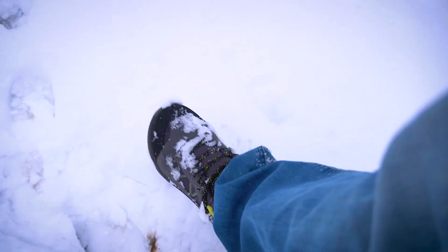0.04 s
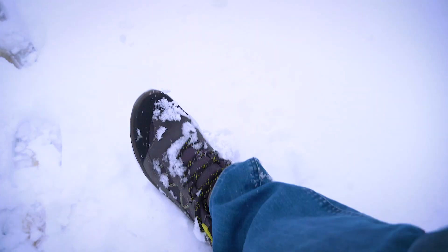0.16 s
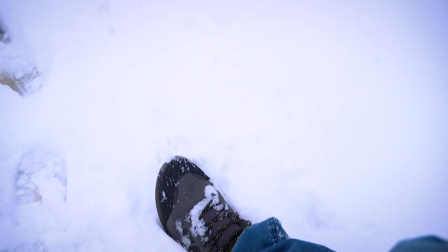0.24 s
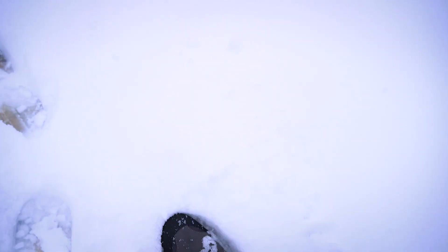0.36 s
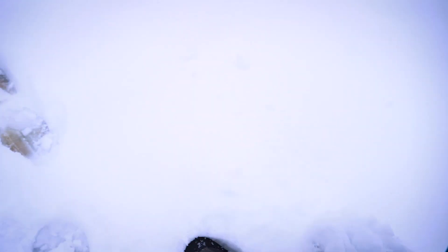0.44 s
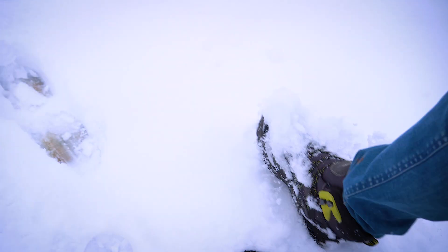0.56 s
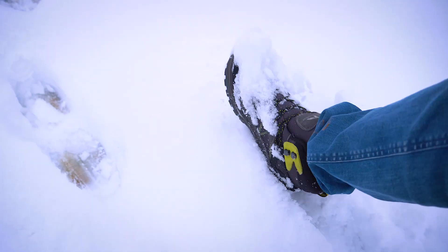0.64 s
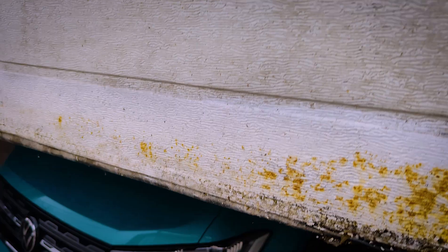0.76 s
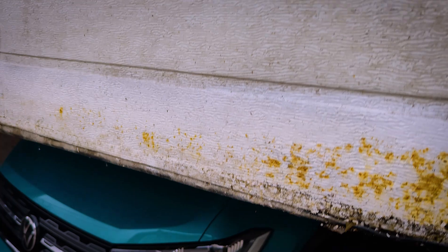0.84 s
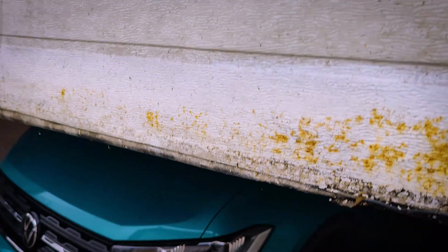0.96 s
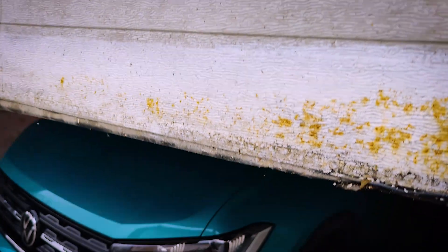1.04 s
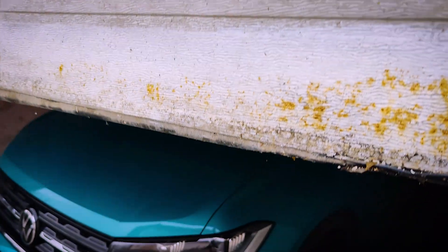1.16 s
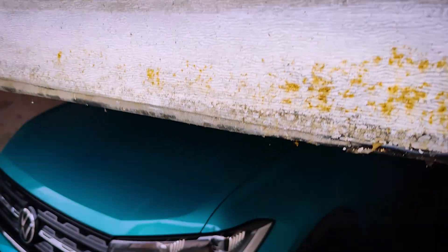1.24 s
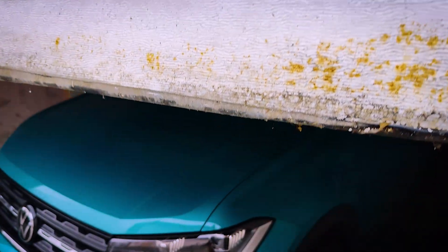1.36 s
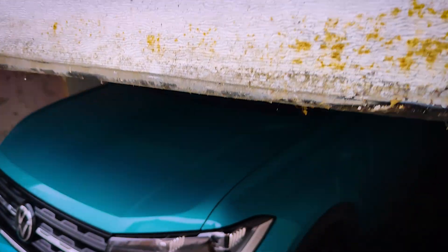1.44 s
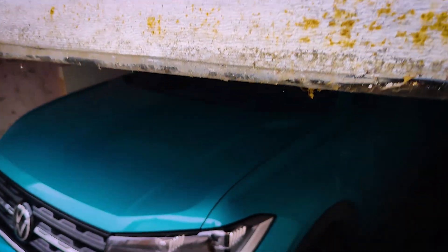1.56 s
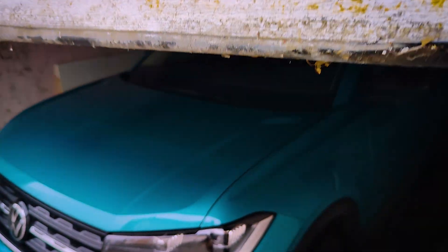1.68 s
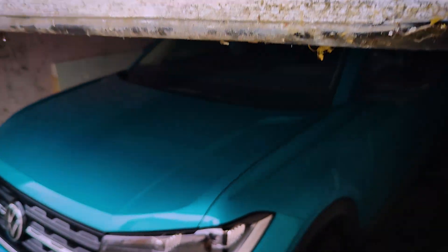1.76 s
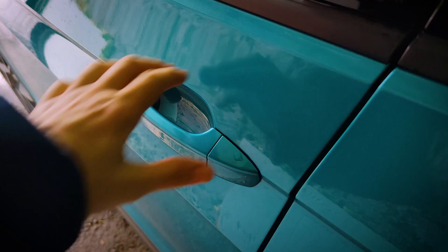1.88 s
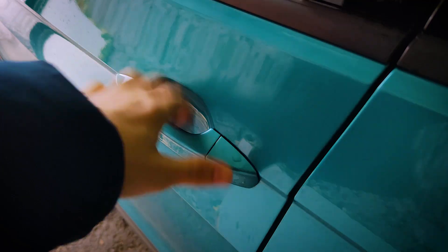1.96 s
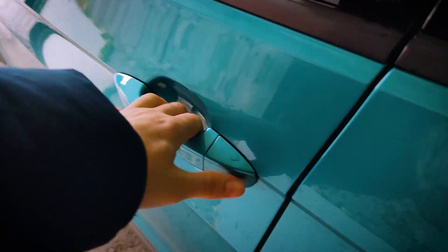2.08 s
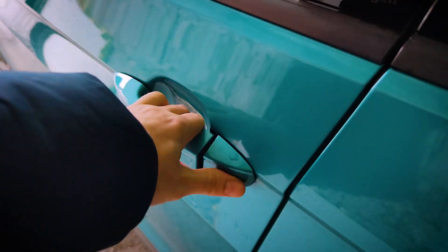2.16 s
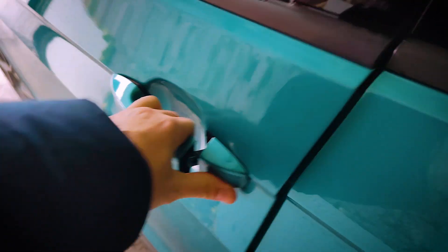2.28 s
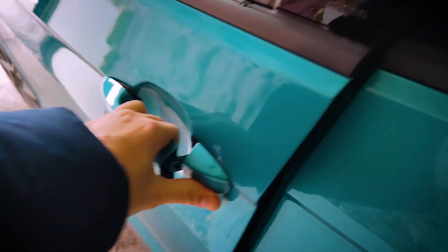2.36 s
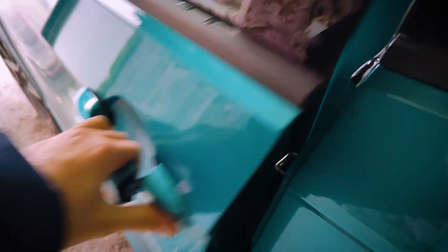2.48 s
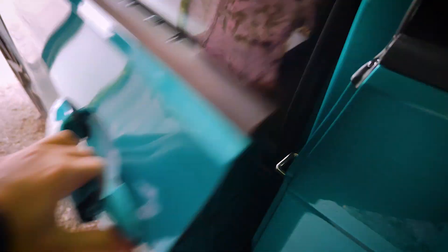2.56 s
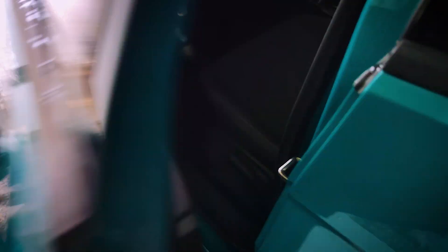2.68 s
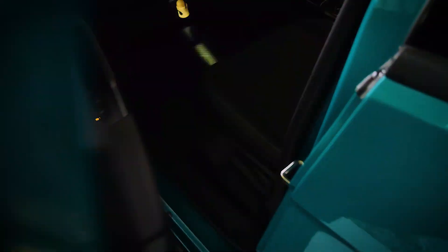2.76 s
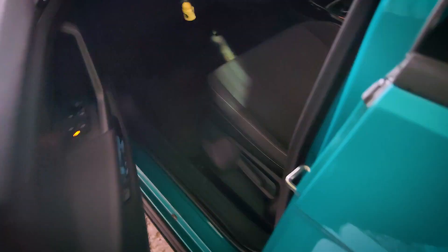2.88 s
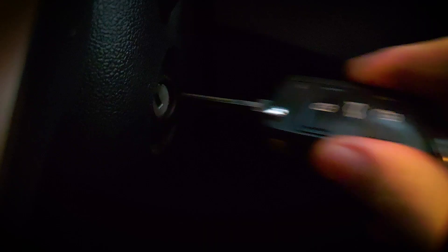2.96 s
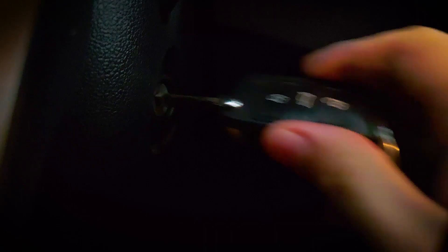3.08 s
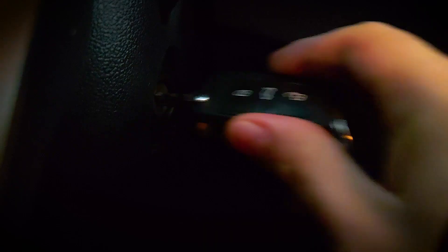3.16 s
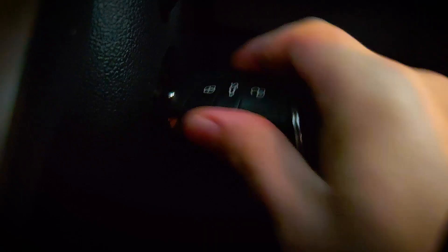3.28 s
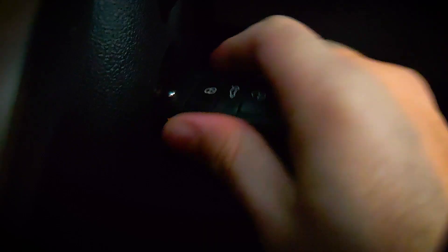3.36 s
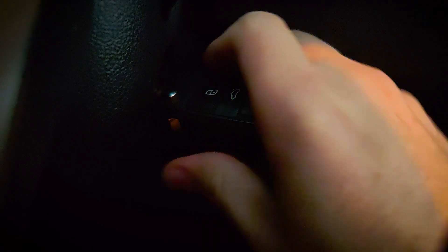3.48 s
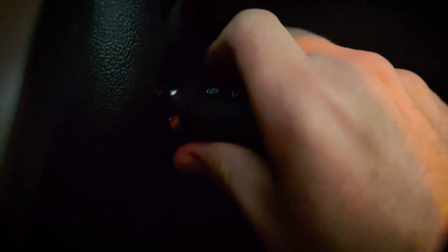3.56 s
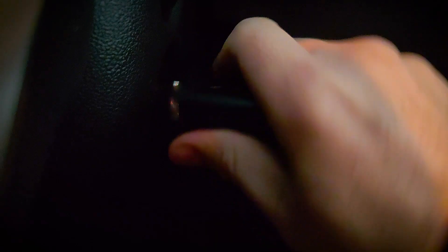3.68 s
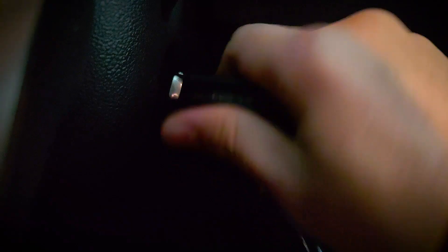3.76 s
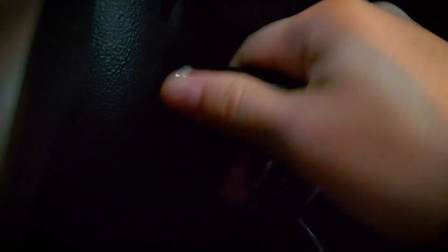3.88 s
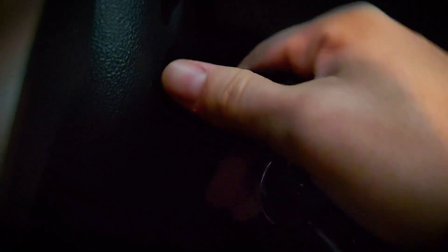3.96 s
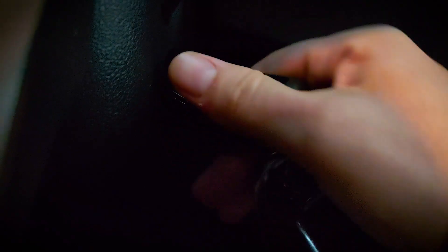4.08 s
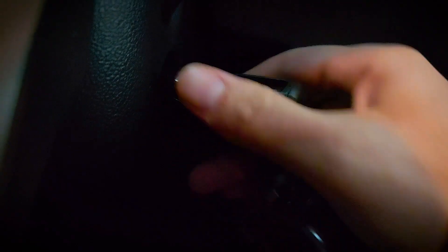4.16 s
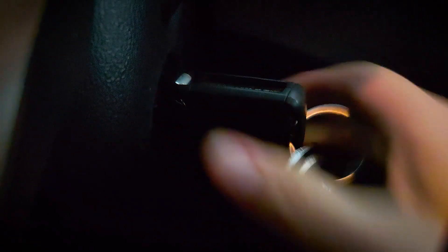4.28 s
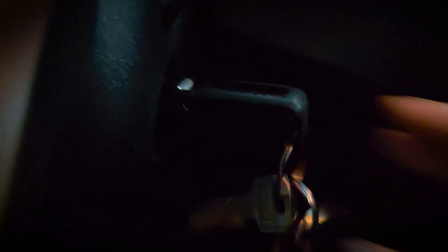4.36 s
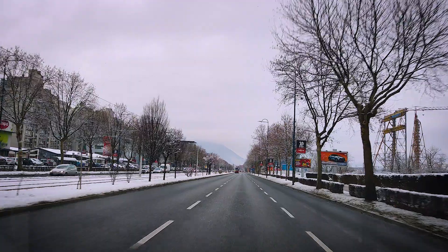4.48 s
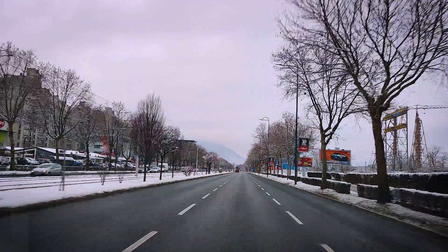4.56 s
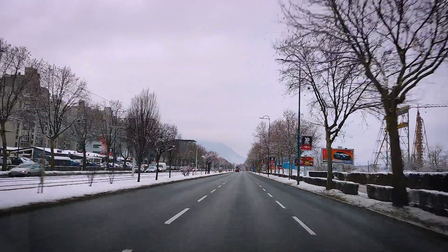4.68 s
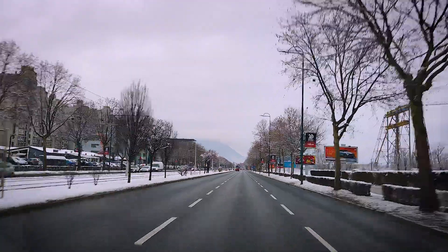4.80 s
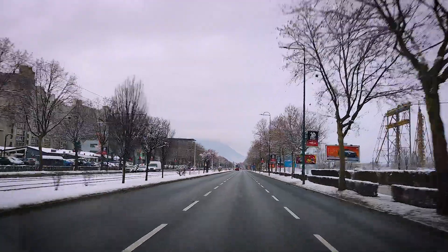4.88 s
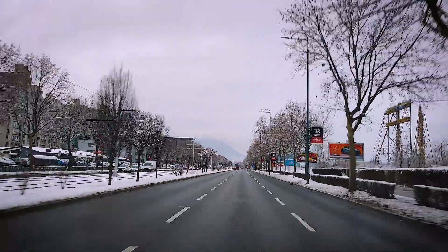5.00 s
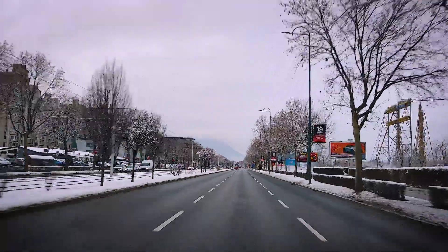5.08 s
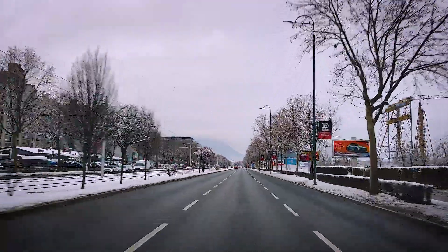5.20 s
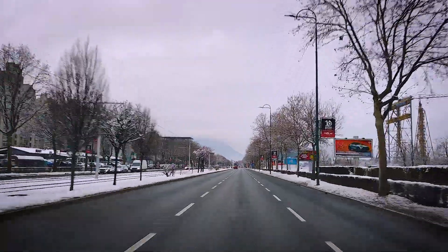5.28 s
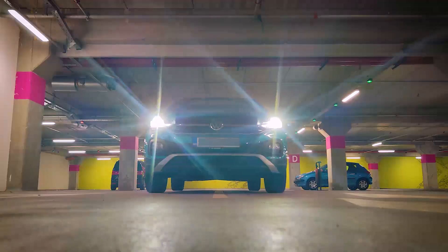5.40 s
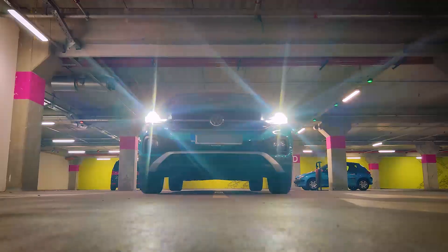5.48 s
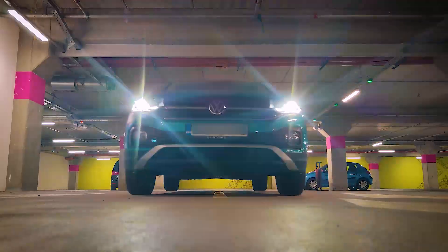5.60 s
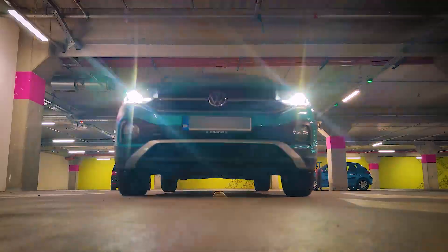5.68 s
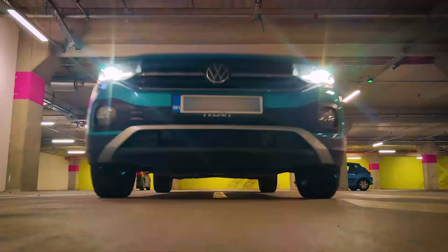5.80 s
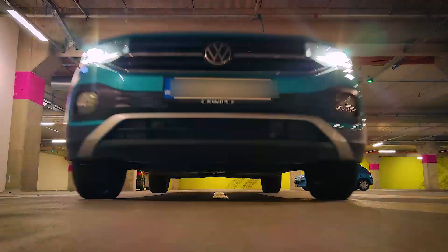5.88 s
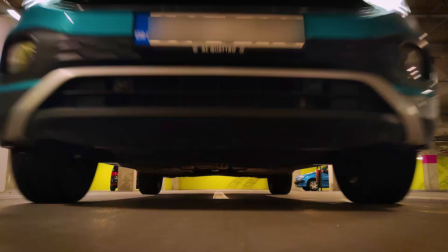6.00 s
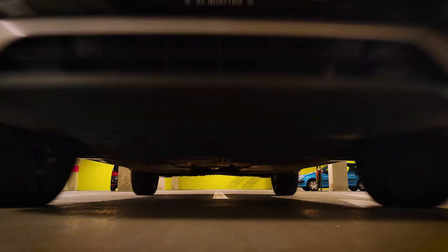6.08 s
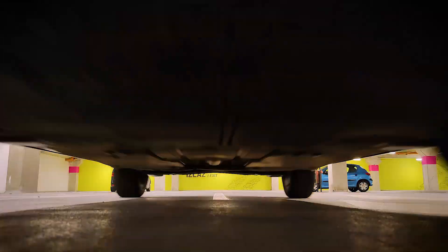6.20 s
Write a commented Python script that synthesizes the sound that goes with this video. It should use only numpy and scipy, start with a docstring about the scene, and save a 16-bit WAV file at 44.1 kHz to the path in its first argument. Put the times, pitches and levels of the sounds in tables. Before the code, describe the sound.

Boots crunch in snow, a motorized garage door hums open, a car door clacks, keys jingle and click, road rumbles, then a car rolls up close.

```python
"""Winter departure by car

Boots crunch through snow in grains and damped pops; a powered garage door hums and rolls up in coloured noise.
A car door is unlatched with clacks, ringing modes and a boom; a key clicks in the ignition, its ring jingling.
Filtered noise makes the road rumble in the cabin, with one bump. Then the car rolls up close in a concrete
car park: tyre hiss, engine tones and a pulsing whine grow with nearness."""
import sys
import numpy as np
from scipy import signal
from scipy.fft import rfft, irfft, next_fast_len
from scipy.io import wavfile
from scipy.ndimage import uniform_filter1d, map_coordinates

SR = 44100
rng = np.random.default_rng(int(sys.argv[2]) if len(sys.argv) > 2 else 0)


def transcribe(signal):
    """Save signal, clipped to [-1, 1], as a 16-bit WAV file at the path in sys.argv[1]."""
    frames = np.atleast_2d(signal).T
    limited = np.clip(frames, -1, 1)
    pcm = np.round(limited * 32767).astype(np.int16)
    wavfile.write(sys.argv[1], SR, pcm)


N = 275184

# stereo likeness out in the snow, close to the listener, and of the car: freq_hz, likeness (1 = identical sides)
SNOW_ALIKE = [(60, 1.0), (240, 1.0), (950, 1.0), (3770, 1.0), (15000, 1.0)]
NEAR_ALIKE = [(100, 0.92), (500, 0.71), (2000, 0.031), (10000, 0.12)]
CAR_ALIKE = [(60, 0.99), (150, 0.98), (380, 0.83), (950, 0.24), (2380, 0.2), (5980, 0.02), (15000, 0.02)]
# stereo balance of a centred source, of the car and of the key: freq_hz, left_minus_right_db
CENTRE = [(1000, 0)]
CAR_PAN = [(60, 0.5), (110, 0.0), (200, 1), (380, -5), (700, -1.5), (1290, -2), (2380, -4), (4400, -6),
           (8120, -13.5), (15000, 45)]
KEY_PAN = [(1000, 6.5), (4400, 0.5), (7400, -6.5), (8300, 9), (10000, 15), (14000, 12)]
# deep rumble of the breeze and of the door boom: freq_hz, level_db
RUMBLE_SPECTRUM = [(15, 3.5), (35, -13), (70, -1), (180, -4), (400, -27.5), (1500, -90)]
# dull murmur of the seat and of the floor pan: freq_hz, level_db
BODY_SPECTRUM = [(71, -56), (120, -6.5), (156, -8), (183, -5), (220, -1.5), (330, -9), (827, -34),
                 (900, -19), (1170, -32), (1980, -120)]


def amp(db):
    """Decibels to gain."""
    return 10 ** (np.asarray(db) / 20)


def unit(x):
    """Scale to rms 1."""
    return x / np.sqrt(np.mean(x ** 2) + 1e-20)


def along(points, hz):
    """Interpolate (Hz, value) points on a log frequency axis."""
    f, v = np.transpose(points)
    return np.interp(np.log(hz + 1), np.log(f + 1), v)


def wobble(rate):
    """A smooth random curve, rate knots a second."""
    knots = rng.standard_normal(int(N * rate / SR) + 4)
    return map_coordinates(knots, [np.arange(N) * rate / SR])


def ramp(start, length):
    """A straight rise from 0 to 1 over length seconds."""
    return np.clip((np.arange(N) / SR - start) / length, 0, 1)


def swell(start, end, attack, release):
    """Full level from start to end; attack and release are the seconds for 20 dB."""
    t = np.arange(N) / SR
    before = np.maximum(start - t, 0)
    after = np.maximum(t - end, 0)
    return amp(-20 * (before / attack + after / release))


def filtered(x, response):
    """Apply a response of frequency to x, in the spectrum."""
    n = x.shape[-1]
    m = next_fast_len(n + 8192)  # padding keeps the end from wrapping onto the start
    return irfft(rfft(x, m) * response(np.fft.rfftfreq(m, 1 / SR)), m)[..., :n]


def sides(pan_db):
    """Left and right gains for a level difference, averaging 1."""
    g = amp(np.array([[.5], [-.5]]) * pan_db)
    return g / g.mean(0)


def add(track, s, sound):
    """Mix a sound into the track from time s."""
    part = track[:, max(round(s * SR), 0):][:, :sound.shape[-1]]
    part += sound[..., :part.shape[1]]


def rush(spectrum, alike, pan=CENTRE, size=N, drive=1):
    """Coloured stereo noise, scaled so its middle has rms 1 before panning; drive makes it grainy."""
    def mid_and_side(hz):
        spread = np.tan(np.arccos(np.clip(along(alike, hz), -.6, 1)) / 2)
        return amp(along(spectrum, hz)) * np.array([np.ones_like(hz), spread])

    mid, side = filtered(drive * rng.standard_normal((2, size)), mid_and_side)
    stereo = np.array([mid + side, mid - side]) / mid.std()
    return filtered(stereo, lambda hz: sides(along(pan, hz)))


def grains(rate, scatter_db):
    """Sparse tiny impulses of uneven size, rate a second."""
    return (rng.random(N) < rate / SR) * amp(scatter_db * rng.standard_normal(N))


def ring(modes, t, scatter_db):
    """Sum of decaying sine modes, struck at slightly new strengths."""
    return sum(amp(db + scatter_db * rng.normal() - 60 * t / t60) * np.sin(2 * np.pi * hz * t)
               for hz, db, t60 in modes)


def pop(t, hz, cycles):
    """A push that swells and dies within a few cycles."""
    age = 4 * t * hz / cycles
    return age * np.exp(1 - age) * np.sin(2 * np.pi * hz * t)


def hum(lines, waver, flutter_db):
    """Unsteady machine tones; high ones reach the two ears out of step."""
    out = np.zeros((2, N))
    for hz, db in lines:
        phase = 2 * np.pi * np.cumsum(hz * (1 + waver * wobble(60))) / SR
        lag = np.array([[.5], [-.5]]) * min(hz / 900, 1)
        out += amp(db) * unit(amp(flutter_db * wobble(15)) * np.sin(phase + lag))
    return out


def patchy(x, depth_db):
    """Short-lived resonances: random gain patches over frequency and time."""
    z = signal.stft(x, nperseg=512)[2]
    across_hz = uniform_filter1d(rng.standard_normal(z.shape[1:]), size=3, axis=0)
    field = uniform_filter1d(across_hz, size=12, axis=1)
    gain = unit(amp(depth_db * unit(field)))
    return signal.istft(z * gain, nperseg=512)[1][:, :x.shape[1]]


def steady(x, size):
    """Even out the chance swells of a noise, over size samples."""
    power = np.abs(uniform_filter1d(x.mean(0) ** 2, size=size))
    return x / np.sqrt(power + .1)  # the floor limits the boost of lulls


def background():
    """Faint still air as shaped noise: centred out in the snow, wider and with less deep rumble indoors."""
    # still air: freq_hz, level_db
    air = [(15, -33), (25, 11.5), (274, -3), (411, 3.5), (552, -13), (666, -4.5), (1450, -7.5), (2700, -12),
           (6930, -10), (8140, -18.5), (13900, -13), (15500, -46)]
    outdoor_db, indoor_db = -58, -58.5
    indoors = ramp(.59, length=.049)
    room = filtered(rush(air, NEAR_ALIKE), lambda hz: amp(along([(30, -6), (120, 0.5)], hz)))
    return amp(outdoor_db) * (1 - indoors) * rush(air, SNOW_ALIKE) + amp(indoor_db) * indoors * room


def boots():
    """Each step swishes through powder, then packs the snow in dull grains, crisp crackle and pops of slipping."""
    # boot weight bearing on the snow: start_s, end_s, packing_db, crackle_db, powder_db (before a swish boost)
    steps = [(0.092, 0.133, -63, -66, -60.5), (0.365, 0.438, -38, -53, -53),
             (0.472, 0.496, -35.5, -49, -57), (0.802, 0.959, -34.5, -54, -50.5)]
    # snow giving way under the sole: start_s, level_db, pitch_hz, ringing_cycles, crack_db (relative)
    slips = list([(.2406, -18.5, 283, 2, -12), (.244, -20.5, 536, 3.6, -18), (.308, -20, 430, 1.2, -17),
                  (.3165, -32, 300, 1, -5), (.362, -26, 270, 2.8, -11), (.3715, -25.5, 325, 1.3, -9),
                  (.3825, -23, 396, 1.1, -6), (.4005, -27, 560, 2.7, -7), (.424, -39, 480, 1.6, -7),
                  (.432, -32, 420, 0.97, -4), (.4425, -35, 620, 1.4, -3), (.4625, -27, 398, 1.4, -6),
                  (.4705, -35, 640, 1.8, -5), (.4905, -26, 390, 1.6, -10), (.4968, -15.5, 382, 1.34, -8),
                  (.5015, -21.5, 690, 0.67, -10), (.585, -25, 696, 0.18, -28), (.795, -32.5, 614, 1.4, -7),
                  (.802, -30, 395, 3.1, -14), (.8275, -19.5, 396, 2.1, -2), (.849, -17.5, 455, 1.5, -0.5),
                  (.8805, -21.5, 420, 0.97, 1), (.911, -17.5, 594, 1.3, -3), (.9218, -22, 350, 1, 0.5),
                  (.937, -31, 442, 1.6, -5), (.955, -28, 418, 1.7, -10), (.9745, -27, 480, 1.4, -16),
                  (1.039, -18.5, 484, 1.1, -3)])
    # packed snow, snapping crystals and brushed powder: freq_hz, level_db
    packing_spectrum = [(76, -13), (150, -0.5), (260, 0.5), (380, -1), (480, -10), (620, -12), (800, -14),
                        (1450, -44), (2500, -35), (5500, -90)]
    crackle_spectrum = [(300, -23), (600, 2), (1000, -5), (1700, -3), (3000, -16), (5000, -22), (9000, -47)]
    powder_spectrum = [(530, -2), (900, -3), (1450, -4), (2480, -8), (3720, -7.5), (6280, -20),
                       (10600, -24.5), (12700, -30), (15500, -27)]
    pack_attack_s, swish_attack_s, release_s = .044, .28, .049  # powder is brushed aside before the snow packs
    small_slips, small_slip_db, small_slip_hz = 3, -6, 580  # lesser slips in each step, relative to its packing

    packing, crackle, powder = np.zeros((3, N))
    for start, end, packing_db, crackle_db, powder_db in steps:
        weight = swell(start, end, pack_attack_s, release_s)
        packing += amp(packing_db) * weight
        crackle += amp(crackle_db) * weight
        powder += amp(powder_db) * swell(start, end, swish_attack_s, release_s)
        for k, (late, pitch) in enumerate(rng.standard_normal((small_slips, 2))):
            s = start + (end - start) * (k + .5 + 0.19 * late) / small_slips
            slips.append((s, packing_db + small_slip_db, small_slip_hz * np.exp(.18 * pitch), 1.8, -8))

    out = packing * rush(packing_spectrum, SNOW_ALIKE, drive=grains(rate=1100, scatter_db=3))
    out += crackle * rush(crackle_spectrum, SNOW_ALIKE, drive=grains(rate=450, scatter_db=1.5))
    out += amp(5.5) * powder * rush(powder_spectrum, SNOW_ALIKE, drive=grains(rate=3500, scatter_db=-1.0))
    t = np.arange(SR // 25) / SR
    for s, db, hz, cycles, crack_db in slips:
        crack = amp(crack_db) * pop(t, hz=970, cycles=1.66)
        crumble = amp(-23.0 - 60 * t / 0.053) * rush(powder_spectrum, SNOW_ALIKE, size=len(t))
        add(out, s, amp(db) * (pop(t, hz, cycles) + crack + crumble))
    breeze = amp(-44.5) * swell(.37, 1, attack=2.4, release=0.28) * rush(RUMBLE_SPECTRUM, SNOW_ALIKE)
    return out + breeze


def thuds():
    """Soft heavy contacts swell and die at one low pitch."""
    # dull blows of heel, door panel and suspension: start_s, envelope_peak_db, pitch_hz, rise_s, t60_s
    blows = [(0.136, -40, 187, 0.0032, 0.18), (0.507, -27.5, 59, 0.0052, 0.25), (.675, -35, 53, .008, 0.13),
             (1.04, -26, 215, 0.0039, 0.26), (1.209, -27.5, 212, 0.0033, 0.18),
             (2.287, -28, 218, 0.0039, 0.11), (2.954, -35, 230, 0.0069, 0.2),
             (3.208, -37.5, 244, 0.0053, 0.066), (4.563, -17, 98, 0.0035, 0.16),
             (4.67, -17.5, 148.5, 0.015, 0.19), (4.714, -10, 118, 0.017, 0.11),
             (4.777, -16, 144, 0.0029, 0.098), (5.16, -22, 150, .008, .1), (5.496, -16, 128, 0.005, 0.088)]
    out, t = np.zeros((2, N)), np.arange(SR // 2) / SR
    for s, db, hz, rise, t60 in blows:
        envelope = (1 - np.exp(-(t / rise) ** 2)) * amp(-60 * t / t60)
        add(out, s, amp(db) * envelope / envelope.max() * np.sin(2 * np.pi * hz * t))
    return out


def garage_door():
    """The motor hums through the panels and the rollers run along their tracks, off to one side."""
    # droning panels and running rollers: freq_hz, level_db
    panel_spectrum = [(21, -45), (35, -46), (54, -4), (80, -25), (103, -4), (134, -10.5), (166, -6),
                      (211, 2.5), (320, -8.5), (356, -10), (382, -12.5), (579, -25), (600, -10.5),
                      (780, -22), (1320, -120)]
    roller_spectrum = [(260, -52), (450, -1.5), (650, -2), (900, -0.5), (1500, -2), (1870, 0), (2700, -9),
                       (3850, -5.5), (4600, -16), (5500, -14), (8100, -28), (13800, -31), (15500, -69)]
    # motor tones: pitch_hz, level_db (before the motor's overall level)
    motor_lines = [(59.2, -53), (177.6, -42), (355, -67), (624.5, -49), (712, -74)]
    # stereo width: freq_hz, likeness
    alike = [(100, 0.99), (500, 0.97), (2000, 0.32), (8000, 0.033)]
    # roller balance: freq_hz, left_minus_right_db
    pan = [(60, -0.5), (110, 0.0), (200, -1.0), (380, 4), (700, -3.5), (1290, -3), (2380, -7), (4400, -8.5),
           (8120, 6), (15000, 6)]
    start_s, run_up_s, left_behind_s, fade_s = .57, .47, 1.98, .8
    drone_db, drone_sag_db_per_s = -34, 9.5  # the panels quieten as they roll overhead
    roller_db, roller_sag_db_per_s = -37.5, 4
    motor_db, motor_growth_db_per_s = -11.5, 13.5  # the motor comes forward as the door lifts

    speed = ramp(start_s, run_up_s)
    full_speed_s = start_s + run_up_s
    lifting = np.clip(np.arange(N) / SR, full_speed_s, left_behind_s) - full_speed_s  # seconds at full speed
    heard = swell(0, left_behind_s, fade_s, fade_s)
    drone_level = amp(drone_db - drone_sag_db_per_s * lifting + 1.1 * wobble(9.6))
    drone = speed ** 2 * drone_level * rush(panel_spectrum, alike)
    roller_level = amp(roller_db - roller_sag_db_per_s * lifting + 0.35 * wobble(60))
    rolling = roller_level * rush(roller_spectrum, alike, pan, drive=grains(rate=6000, scatter_db=-0.5))
    motor_level = amp(motor_db + motor_growth_db_per_s * lifting)
    motor = motor_level * hum(motor_lines, waver=.006, flutter_db=2)
    lead_s = np.array([[.5], [-.5]]) * 0.00043  # the left ear hears it first
    return filtered(heard * speed * (drone + rolling + motor), lambda hz: np.exp(2j * np.pi * hz * lead_s))


def car_door():
    """The handle knocks as it is gripped and pulled; the latch springs and the hollow door booms."""
    # handle knocks: start_s, level_db, t60_s
    handle = [(2.03, -13.5, 0.046), (2.236, -25, 0.1), (2.29, -30, 0.085), (2.496, -29.5, 0.13)]
    # the latch lets go and the door shudders: start_s, clack_db, panel_ring_db, steel_ring_db
    latch = [(2.3546, -2.5, -3.5, -23), (2.3604, -7.5, -28, -26), (2.3691, -8.5, -11, -26.5),
             (2.389, -15, -14, -42), (2.412, -26, -15.5, -52), (2.437, -36, -23, -60)]
    # gripped handle and latch clack: freq_hz, level_db
    grip_spectrum = [(110, -18), (180, -4), (322, 1), (518, 0.5), (668, 1), (847, -26), (980, -12.5),
                     (1460, -15.5), (1750, -33), (3570, -17.5), (4520, -25), (14000, -43), (15000, -70)]
    clack_spectrum = [(180, -17), (240, 4.5), (295, -2), (350, -14), (423, -12), (568, -5), (1020, -20),
                      (1470, -25), (1910, -26), (2300, -21), (2700, -26), (3020, -18), (3400, -23.5),
                      (4320, -30), (5800, -30), (14000, -44.5), (15000, -71)]
    # ringing door panel and latch steel: freq_hz, level_db, t60_s
    door_modes = [(37.6, -28, 0.7), (88, -18, .3), (117.4, -17, 0.2), (163, -4.5, 0.15), (253, 4, 0.045),
                  (290, -11, .05), (421, -23.5, 0.15), (526, -13, 0.063), (697, -26, 0.1)]
    steel_modes = [(1130, -10, 0.074), (1470, -4, 0.093), (1790, -6, .08), (2380, -7, 0.06),
                   (2970, 6.5, 0.033), (3360, -4, 0.05), (3900, -7, .05), (5460, -7, .05)]

    out, t = np.zeros((2, N)), np.arange(SR) / SR
    for s, db, t60 in handle:
        envelope = amp(db - 5.0 - 60 * t / t60) * (1 - np.exp(-t / 0.00083))
        add(out, s, envelope * rush(grip_spectrum, NEAR_ALIKE, size=SR))
    for s, clack_db, panel_db, steel_db in latch:
        clack_envelope = amp(-10.5 - 60 * t / 0.067) * (1 - np.exp(-t / 0.0035))
        clack = clack_envelope * rush(clack_spectrum, NEAR_ALIKE, size=SR)
        panel = ring(door_modes, t, scatter_db=1) * (1 - np.exp(-t / 0.0076))
        steel = np.array([ring(steel_modes, t, scatter_db=6.0) for ear in range(2)])
        steel *= 1 - np.exp(-t / 0.0017)
        steel /= np.abs(steel).max()
        add(out, s, amp(clack_db) * clack + amp(panel_db) * panel + amp(steel_db) * steel)
    # the door skin and cabin air boom on after the latch
    boom = rush(RUMBLE_SPECTRUM, NEAR_ALIKE, size=SR) + amp(-11.5) * rush(grip_spectrum, NEAR_ALIKE, size=SR)
    add(out, latch[0][0], amp(-24 - 60 * t / .5) * boom)
    return out


def creak():
    """Stick-slip in the sprung handle: a rough gliding tone with a weak overtone, dying away."""
    # start_s, length_s, first_pitch_hz, last_pitch_hz, level_db
    glides = [(2.032, 0.046, 539, 347, -32.5), (2.128, 0.038, 385, 395, -34.5),
              (2.165, 0.09, 435, 457, -42)]
    fall_db = 10  # over the length of a creak
    out = np.zeros(N)
    for s, length, first_hz, last_hz, db in glides:
        travel = ramp(s, length)
        hz = (first_hz + (last_hz - first_hz) * travel) * (1 + .04 * wobble(260))
        phase = 2 * np.pi * np.cumsum(hz) / SR
        level = amp(db - fall_db * travel + 3.55 * wobble(110))
        level *= swell(s, s + length, attack=0.012, release=0.13)
        out += level * unit(np.sin(phase) + amp(-11.0) * np.sin(2 * phase))
    return out


def taps():
    """Light dry contacts of door handle, latch, fingers and plastic fob: noise ticks, each broadly resonant."""
    # start_s, peak_db, centre_hz, t60_s
    contacts = [(2.238, -25, 950, 0.097), (2.292, -36, 1300, 0.06), (2.4158, -33, 3500, 0.028),
                (2.605, -38, 1910, 0.031), (2.693, -36.5, 1920, 0.027), (2.764, -37, 1480, 0.062),
                (2.788, -39.5, 1670, 0.047), (2.852, -37, 1170, 0.047), (2.895, -42, 1500, 0.036),
                (2.96, -32.5, 2090, 0.067), (3.004, -36.5, 2510, .04), (3.03, -34, 3200, .04),
                (3.044, -28.5, 1870, 0.092), (3.546, -43, 1470, 0.033), (3.785, -43, 1600, 0.053),
                (4.104, -41.5, 1500, 0.082), (4.149, -36, 1640, 0.057), (4.198, -38, 1690, 0.032),
                (4.235, -47, 1750, 0.029)]
    # shape of the hollow resonance: multiple_of_centre, level_db
    tap_shape = [(.2, -2), (.45, -4), (.7, -5), (1, 0), (1.4, -6), (2.1, -10), (4, -25), (7, -44)]
    out, t = np.zeros((2, N)), np.arange(SR // 8) / SR
    for s, db, hz, t60 in contacts:
        band = [(hz * multiple, level) for multiple, level in tap_shape]
        envelope = amp(-60 * t / t60) * (1 - np.exp(-t / 0.00061))
        tick = envelope * rush(band, NEAR_ALIKE, size=len(t))
        add(out, s, amp(db) * tick / np.abs(tick).max())
    return out


def fumbling():
    """The driver settles in: the seat murmurs, a sleeve brushes past and the key blade scrapes, all as noise."""
    # the driver's weight moves against door and seat: start_s, end_s, level_db
    shifts = [(2.265, 2.35, -39), (2.81, 3.32, -52), (4.02, 4.06, -55)]
    # strokes of cloth and of the key blade: centre_s, level_db, length_s, centre_hz
    brushes = [(2.613, -51.5, 0.024, 3400), (2.787, -51.5, 0.032, 2120), (2.878, -49, 0.05, 3240),
               (2.966, -59, 0.011, 3000), (3.055, -49.5, 0.045, 2760), (3.231, -55.5, 0.022, 6500),
               (3.305, -58, 0.0073, 6500), (3.341, -48.5, 0.062, 6700), (3.535, -54, 0.04, 5240),
               (3.757, -53.5, 0.068, 3960), (4.45, -43, 0.036, 3000)]
    # sleeve colour: freq_hz, level_db
    sleeve_spectrum = [(410, 1), (700, 8), (1290, -5.5), (1760, -2.5), (2370, -17), (3500, -7.5),
                       (8550, -16.5), (13600, -18), (15500, -56)]
    # sleeve balance: freq_hz, left_minus_right_db
    sleeve_pan = [(1000, 1.5), (4400, -6.5), (7400, -11), (8300, 10), (10000, 12), (14000, 20)]

    weight = sum(amp(db) * swell(start, end, attack=.19, release=.34) for start, end, db in shifts)
    out = weight * rush(BODY_SPECTRUM, NEAR_ALIKE)
    buzz_s, buzz_hz, buzz_db = 3.49, 417, -50.5  # a faint short buzz once the key is in
    buzz = hum([(buzz_hz, buzz_db)], waver=0.058, flutter_db=5.0)
    out += swell(buzz_s, buzz_s, attack=0.079, release=0.13) * buzz
    t = np.arange(SR // 4) / SR - 1 / 8  # seconds from the middle of the stroke
    for s, db, length, hz in brushes:
        band = []
        for f, level in sleeve_spectrum:
            octaves = np.log2(f / hz)
            band.append((f, level - 5 * octaves ** 2 / (1 + np.abs(octaves))))
        rubbing = grains(rate=3000, scatter_db=1.5)[:len(t)]
        scrape = rush(band, NEAR_ALIKE, sleeve_pan, size=len(t), drive=rubbing)
        add(out, s + t[0], amp(db) * np.exp(-2 * (t / length) ** 2) * patchy(scrape, depth_db=5.0))
    return out


def ignition():
    """Each click is a sharp crack, a short rattle of the tumblers and a knock in the steering column."""
    # key against lock: start_s, level_db, knock_db, treble_db (before a lift), left_minus_right_db, rise_s, t60_s
    clicks = [(3.1529, -17.5, -14.5, -9, 3, 0.00079, 0.043), (3.1565, -15, -13, -15.5, 3, 0.001, 0.044),
              (3.3627, -12, -7, -24.5, -2, 0.0005, 0.043), (3.878, -24, -22, -19, 3, .002, 0.036),
              (3.8815, -6.5, -27, -15, 0.5, 0.00059, 0.031), (3.9085, -23, -12, -7, 10, .004, 0.051),
              (3.919, -18, -10.5, -10, 1, 0.00057, 0.029), (3.9558, -31, -22, -4, -7, .0005, 0.047),
              (3.986, -28, -9, -28, -3, .001, 0.026), (3.9887, -7, -10.5, -25, -2.5, 0.00045, 0.059),
              (3.9934, -15.5, -5.5, -36, 4, 0.00051, 0.05), (4.074, -31, -21, -19.5, 2, .0006, 0.056),
              (4.146, -31.5, -16, -19.5, 3, 0.0012, 0.057)]
    # lock colour: freq_hz, level_db
    lock_spectrum = [(420, -17.5), (710, -5.5), (1050, 3), (1420, -8.5), (1750, -2.5), (2190, -5),
                     (2600, -6.5), (3980, -2), (4580, -5.5), (6950, -5), (8340, -15.5), (11300, -8.5),
                     (12900, -16), (14300, -16), (14700, -45), (15500, -53)]
    # steering column resonances: freq_hz, width_hz, level_db
    column_modes = [(134, 47, 3.5), (226, 35, 7.5), (374, 106, 9), (650, 114, 8), (760, 140, 6.5),
                    (1060, 82, -1.5), (1310, 130, -0.5), (1845, 220, 1.5), (2130, 720, -10)]

    def column(f):
        """Parallel resonances of alternating sign."""
        return sum((-1) ** k * amp(db) * 1j * f * width / (centre * centre - f * f + 1j * f * width)
                   for k, (centre, width, db) in enumerate(column_modes))

    out, t = np.zeros((2, N)), np.arange(SR // 4) / SR
    for s, db, knock_db, treble_db, pan_db, rise, t60 in clicks:
        crack = amp(-16.0 - 60 * t / 0.012)
        rattle = amp(-12.5 - 60 * t / t60)
        click = (crack + rattle) * patchy(rush(lock_spectrum, NEAR_ALIKE, KEY_PAN, size=len(t)), depth_db=2)
        treble_tilt = [(3500, 0.0067), (9000, treble_db + 16.0)]
        click = filtered(click * (1 - np.exp(-t / rise)), lambda hz: amp(along(treble_tilt, hz)))
        push = rush([(60, -11), (250, -11)], [(300, 0.86), (1000, 0.11)], size=len(t))
        knock = filtered(amp(-60 * t / 0.064) * push, column)
        knock /= np.abs(knock).max()
        add(out, s, amp(db) * (sides(pan_db) * click + amp(knock_db) * knock))
    return out


def key_ring():
    """The steel ring slides and chatters on the key: a fine tick, then the modes, in a new mix for each ear."""
    # contacts: start_s, tick_db (before a trim), left_minus_right_db (before scaling), ring_db, bright_ring_db
    jingle = [(3.4158, -23, -16, -45, -58), (3.59, -34, -1, -59, -67), (3.641, -31, -8, -66, -70),
              (3.6906, -22, 8, -40, -64), (3.727, -22, 8, -42, -60), (4.03, -31, 16, -54, -57),
              (4.4367, -20.5, -1, -40, -48), (4.446, -14, -4, -45, -52), (4.455, -20, -2, -37, -35),
              (4.471, -28, 0, -45, -48), (4.5188, -20, 11, -45, -30.5), (4.586, -12, 0, -38, -52),
              (4.5935, -21, -3, -23, -54), (4.615, -22, -2, -44, -56), (4.7225, -12, -5, -35, -60),
              (4.741, -41, 0, -62, -70), (4.766, -28, -3, -49, -70), (4.861, -36, 3, -58, -70)]
    # modes of the ring, and stiffer ones reached by edge-on contacts: freq_hz, level_db, t60_s
    ring_modes = [(4296, -19, 0.16), (6350, -24, 0.054), (6950, -5, 0.055), (7370, 5.5, 0.064),
                  (10100, -18, 0.05), (11550, -5, 0.059), (12600, -16, .06), (14400, -4, .05)]
    bright_modes = [(9476, 0, .075), (9950, -9, .05), (12900, -9, .08), (13802, -7, .08)]
    # tick colour: freq_hz, level_db
    tink_spectrum = [(880, -50), (1500, -24), (3990, -22), (4360, -10), (5240, -17), (7100, -0.5),
                     (7680, -4.5), (8140, -23), (9900, -11), (10700, -16), (13000, -10), (14400, -19),
                     (15500, -59)]

    out, t = np.zeros((2, N)), np.arange(SR // 4) / SR
    for s, tick_db, pan_db, ring_db, bright_db in jingle:
        modes = [(hz, level + ring_db, t60) for hz, level, t60 in ring_modes]
        modes += [(hz, level + bright_db, t60) for hz, level, t60 in bright_modes]
        seat = 1 + .0015 * rng.normal()  # the contact point shifts the pitch a little
        steel = np.array([ring(modes, t * seat, scatter_db=2) for ear in range(2)])
        steel *= (1 - np.exp(-t / 0.0016)) * amp(1.2 * wobble(220)[:len(t)])  # the ring buzzes against the key
        tick_envelope = amp(tick_db - 12 - 60 * t / 0.03) * (1 - np.exp(-t / .0005))
        tink = tick_envelope * patchy(rush(tink_spectrum, NEAR_ALIKE, size=len(t)), depth_db=2.5)
        add(out, s, sides(0.42 * pan_db) * (steel + tink))
        for delay, drop_db in rng.uniform([.003, 10], [.016, 18], size=(2, 2)):  # small rebounds
            rebound = amp(tick_db - drop_db - 11 - 60 * t / 0.018)
            add(out, s + delay, rebound * rush(tink_spectrum, NEAR_ALIKE, size=len(t)))
    # the ring slides on the key as the car pulls away
    sway = amp(-52.5) * swell(4.413, 4.58, attack=0.15, release=0.2)
    out += sway * rush(tink_spectrum, NEAR_ALIKE, drive=grains(rate=5800, scatter_db=3.5))
    return filtered(out, lambda hz: sides(along(KEY_PAN, hz)))


def cabin(x):
    """The car's interior answers with a brief noise tail, the treble dying faster than the bass."""
    # reverberation: freq_hz, t60_s
    cabin_t60 = [(100, 0.45), (500, 0.18), (3000, 0.12), (10000, 0.15)]
    hz, t, z = signal.stft(rng.standard_normal((2, SR // 2)), SR, nperseg=256)
    decay = amp(-60 * t / along(cabin_t60, hz)[:, None])
    tail = signal.istft(z * decay, SR, nperseg=256)[1]
    return signal.fftconvolve(x, tail / np.linalg.norm(tail[0]), axes=1)[:, :N]


def driving():
    """Heard from the cabin: the road roars, a rough patch shakes the chassis and air streams past the body."""
    # road roar, shaken chassis and air stream: freq_hz, level_db
    road_spectrum = [(47, -39), (70, -3), (95, -4), (124, 4), (170, 1), (243, -5), (322, -6), (375, -10),
                     (443, -11.5), (520, -20), (610, -19), (700, -29.5), (900, -28), (1350, -42),
                     (1700, -59), (2640, -86)]
    chassis_spectrum = [(11, -33), (18, -2), (38, 3), (70, 5), (91, -22), (150, -120)]
    draught_spectrum = [(710, -12), (1200, 0.5), (2980, -5.5), (3280, -5.5), (5380, -20), (6380, -10.5),
                        (8170, -47), (14000, -36), (15500, -57)]
    road_db, chassis_db, draught_db = -26, -30, -53
    moving = ramp(4.163, length=.38) ** 1.5
    inside = np.sqrt(1 - ramp(4.98, length=.53) ** 2)  # the cabin gives way to the car park
    road = amp(road_db + .9 * wobble(20)) * steady(rush(road_spectrum, CAR_ALIKE), size=SR // 9)
    shaking = swell(4.58, 5, attack=0.65, release=1.4)
    chassis = amp(chassis_db) * shaking * rush(chassis_spectrum, CAR_ALIKE)
    draught = amp(draught_db) * rush(draught_spectrum, CAR_ALIKE, CAR_PAN)
    return moving * (chassis + inside * (road + draught))


def approaching_car():
    """The decks rumble evenly, while tyre hiss, engine tones and a pulsing whine grow as the distance shrinks."""
    # rumble between the concrete decks, tyre hiss, finest tyre spray and whine: freq_hz, level_db
    hall_spectrum = [(29, -27), (50, 1), (86, -11), (113, 4.5), (240, -3.5), (361, -1.5), (403, -6),
                     (445, -2), (531, -10), (700, -15), (910, -15), (1540, -120)]
    tyre_spectrum = [(180, -23), (300, 0), (446, -9.5), (535, -38), (590, -3.5), (1390, -5), (2560, -14),
                     (2880, -12.5), (4570, -18.5), (6790, -13.5), (8280, -35.5), (12300, -34.5),
                     (13800, -47), (14800, -65), (15500, -107)]
    fizz_spectrum = [(7500, -30), (8800, 2.5), (10000, 1.5), (12500, 4), (14200, -1), (15000, -52)]
    whine_spectrum = [(2450, -45), (2700, -16), (2790, -6), (2860, -3), (2902, 0), (2960, -4), (3030, -24),
                      (3250, -35), (3480, -24), (3560, -10), (3680, -24), (3830, -15), (4100, -45)]
    # engine tone between the decks, engine tones, tones from beneath the engine: pitch_hz, level_db
    hall_lines = [(449, -42)]
    engine_lines = [(236.9, -33), (592, -59), (1136, -42), (1373, -39), (1852, -41.5)]  # before the engine's overall gain
    sump_lines = [(899, -33), (1003, -36.5), (3262, -40), (3650, -38.5)]
    # engine speed: time_s, turns_per_s
    engine_speed = [(5.1, 20.5), (5.5, 21.6), (5.85, 21.9), (5.92, 19.4), (6.02, 18.7), (6.1, 17.4)]
    speed_m_per_s, nearest_m, nearest_s = 3.32, 1.2, 6.426  # the path ends just before its nearest point
    hall_db = -28.5
    tyre_db, fizz_db, whine_db, underbody_db = -24.5, -37.5, -33, -26  # before the distance gain, which is 1 at 1 m
    engine_gain_db = 2

    t = np.arange(N) / SR
    present = ramp(4.98, length=.53)
    nearness = present ** 1.1 / np.hypot(nearest_m, speed_m_per_s * (nearest_s - t))
    hall = amp(hall_db) * steady(rush(hall_spectrum, CAR_ALIKE), size=SR // 9)
    hall = present * (hall + hum(hall_lines, waver=0.01, flutter_db=-2))
    hiss = amp(tyre_db + 0.41 * wobble(30)) * patchy(rush(tyre_spectrum, CAR_ALIKE, CAR_PAN), depth_db=0.7)
    # a second nearness factor: the finest spray only carries from close by
    fizz = amp(fizz_db) * nearness * sides(9.4) * rush(fizz_spectrum, CAR_ALIKE)
    engine = amp(engine_gain_db) * hum(engine_lines, waver=.012, flutter_db=2.5)

    # the whine pulses once and twice a turn
    shaft = 2 * np.pi * np.cumsum(np.interp(t, *np.transpose(engine_speed))) / SR
    shaft -= np.interp(5.655, t, shaft)  # a pulse crests at this second
    throb = unit(amp(3 * np.cos(shaft) + 2 * np.cos(2 * shaft)))
    whine_core = hum([(2898, -3.5)], waver=.006, flutter_db=1)
    pulley = amp(-3) * rush(whine_spectrum, NEAR_ALIKE, CAR_PAN) + whine_core
    # it beams from the grille, until the bumper comes overhead
    beam = swell(5.6, 6.0, attack=4.3, release=.42)
    whine = amp(whine_db) * beam * throb * steady(pulley, size=SR // 70)

    # engine drone under the floor pan, also with nearness twice
    underbody = amp(underbody_db) * nearness * rush(BODY_SPECTRUM, CAR_ALIKE)
    overhead = swell(6.17, nearest_s, attack=.047, release=.047)  # the engine comes overhead
    sump = overhead * hum(sump_lines, waver=0.0068, flutter_db=3)
    return hall + nearness * (hiss + fizz + engine + whine + underbody + sump)


def scene():
    """Snow, garage, car door, key and drive over a faint background."""
    outdoors = background() + boots() + thuds() + garage_door()
    door = sides(-1.5) * (car_door() + creak())
    contacts = taps() + ignition() + key_ring()
    inside = fumbling() + contacts + cabin(amp(-14) * door + amp(-13.5) * contacts)
    return outdoors + door + inside + driving() + approaching_car()


def record(dry):
    """Nothing is kept above the band limit."""
    top_hz = 15800
    return filtered(dry, lambda hz: hz < top_hz)


dry = scene()
out = record(dry)
transcribe(out)
```